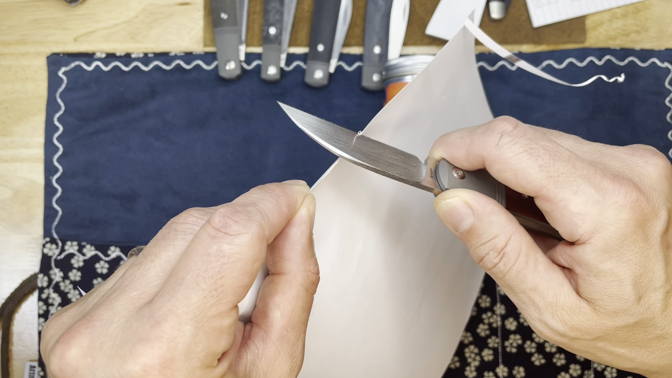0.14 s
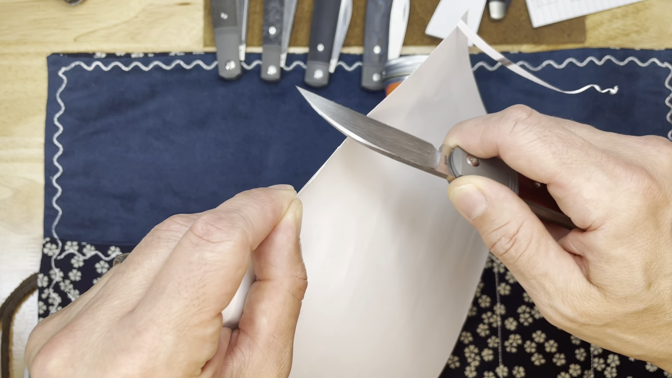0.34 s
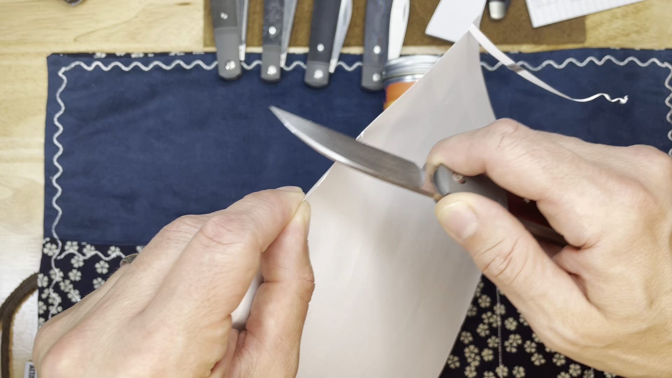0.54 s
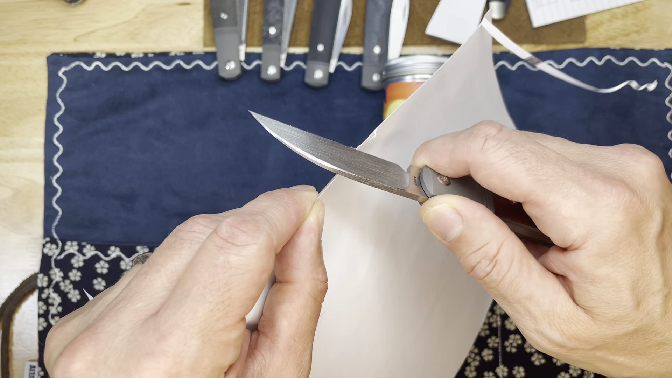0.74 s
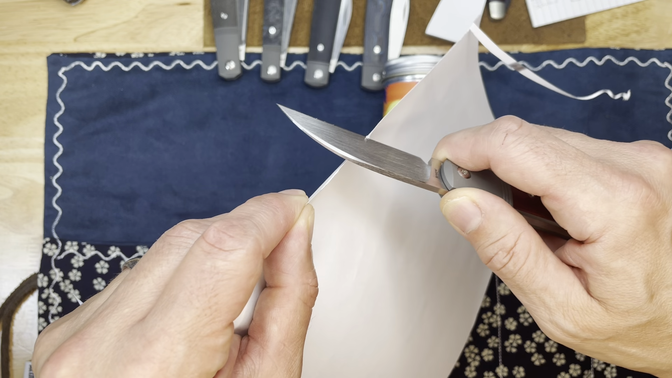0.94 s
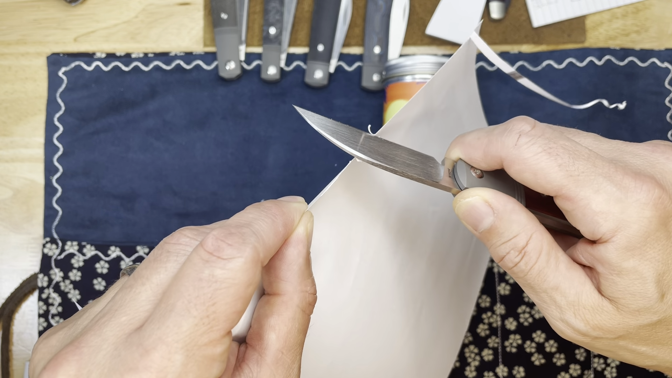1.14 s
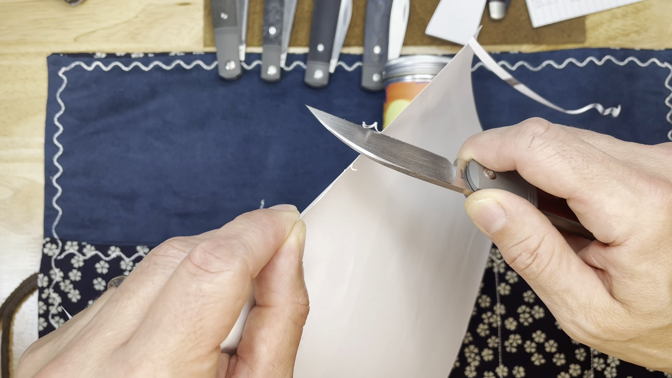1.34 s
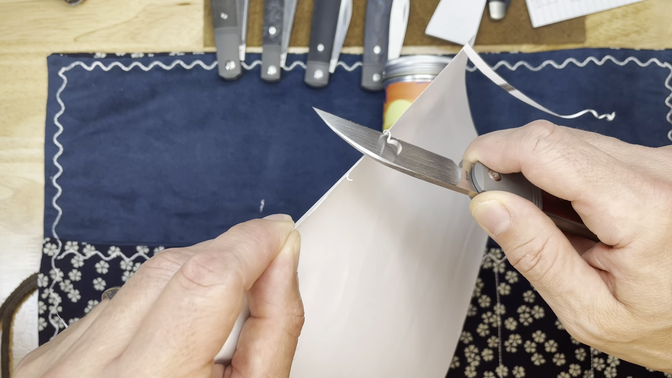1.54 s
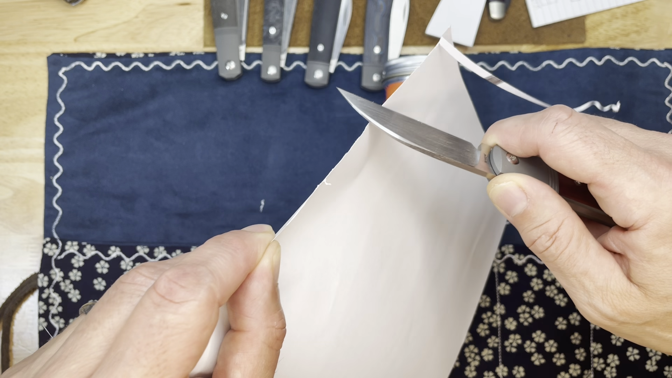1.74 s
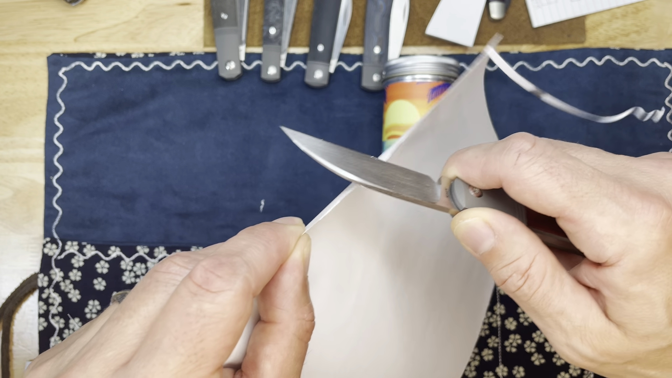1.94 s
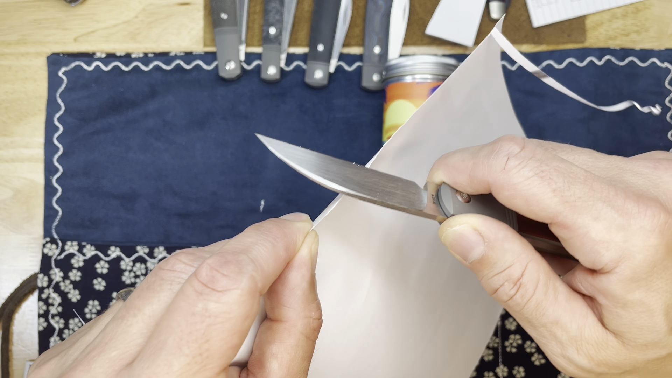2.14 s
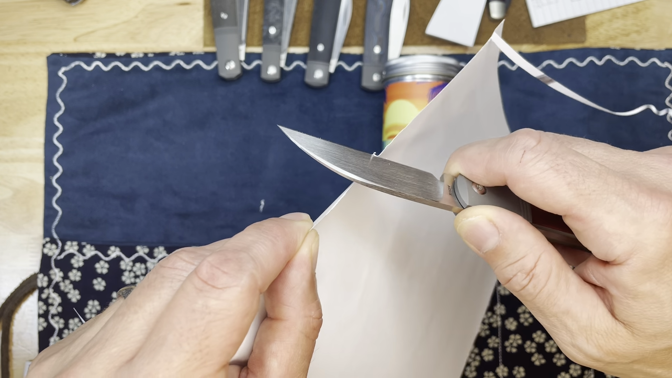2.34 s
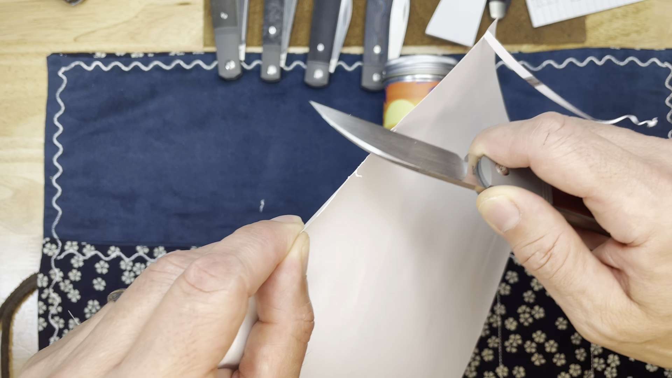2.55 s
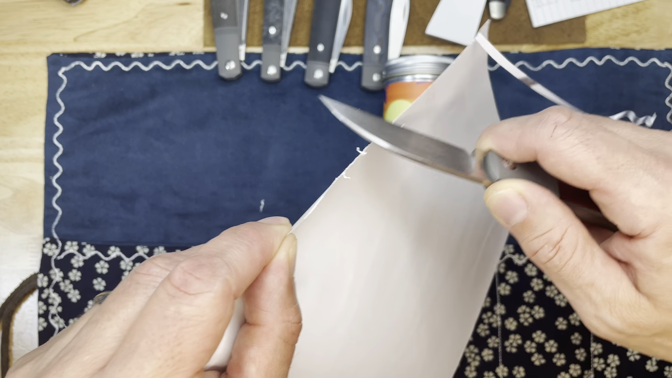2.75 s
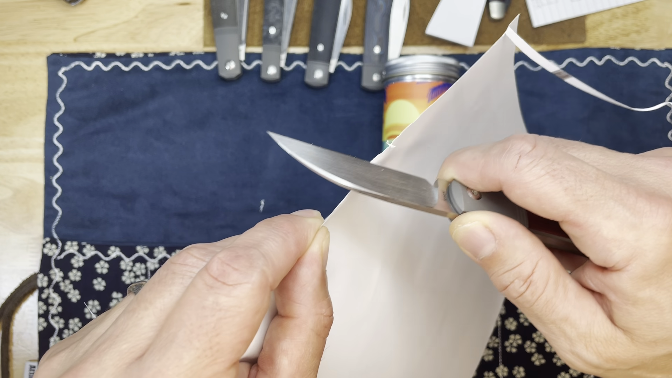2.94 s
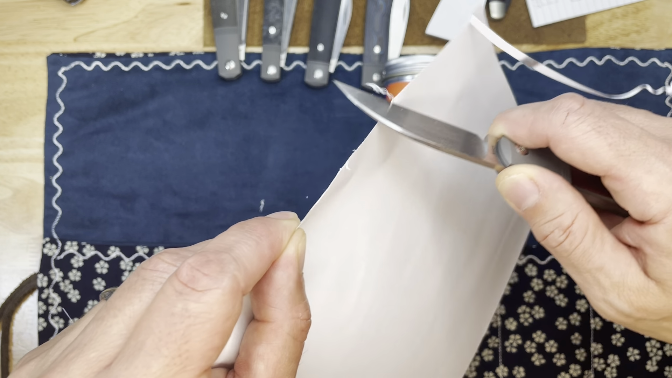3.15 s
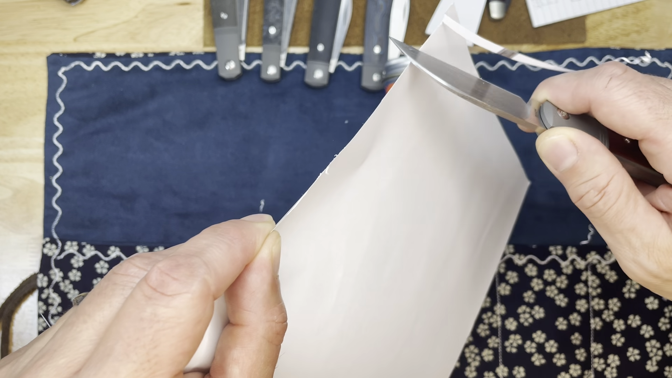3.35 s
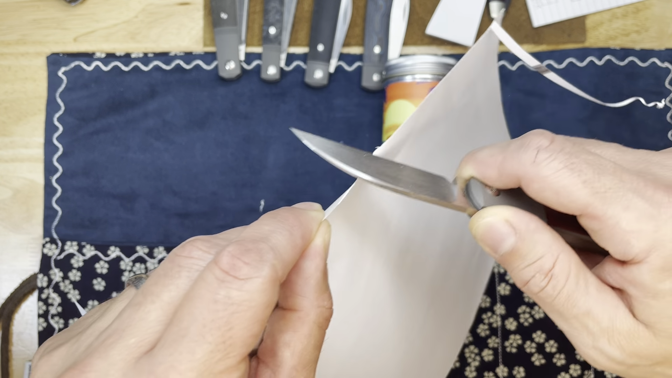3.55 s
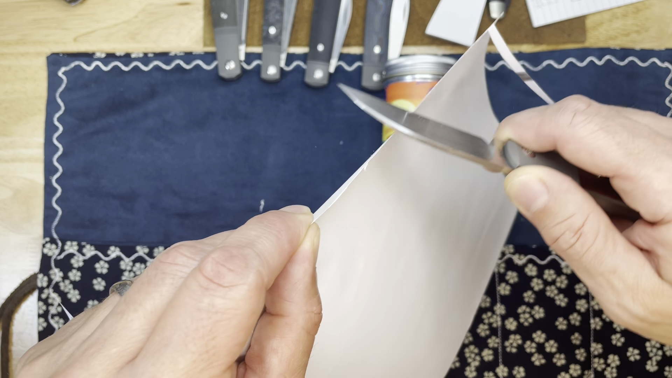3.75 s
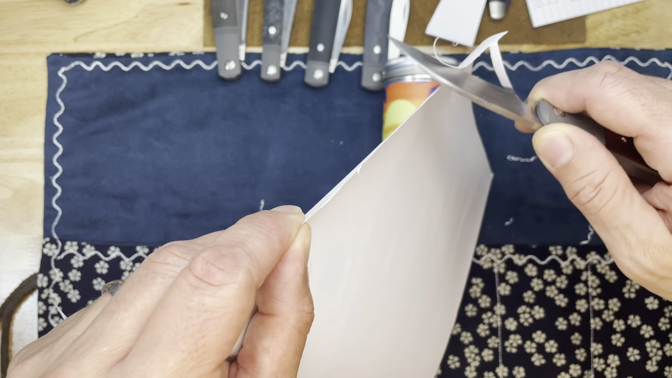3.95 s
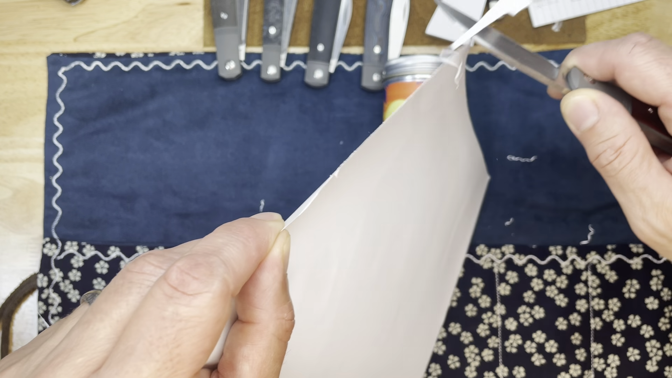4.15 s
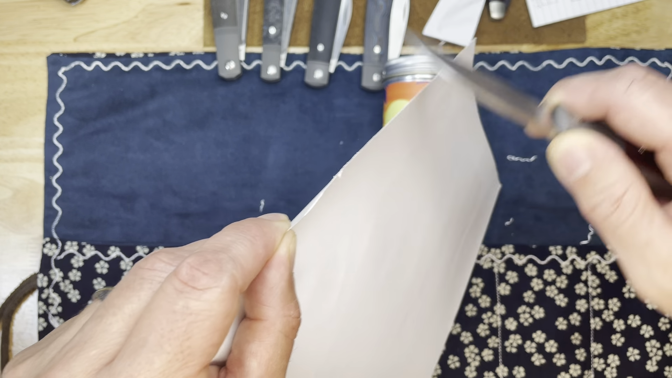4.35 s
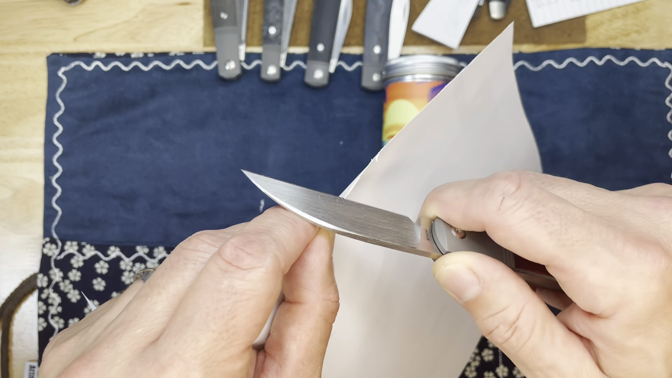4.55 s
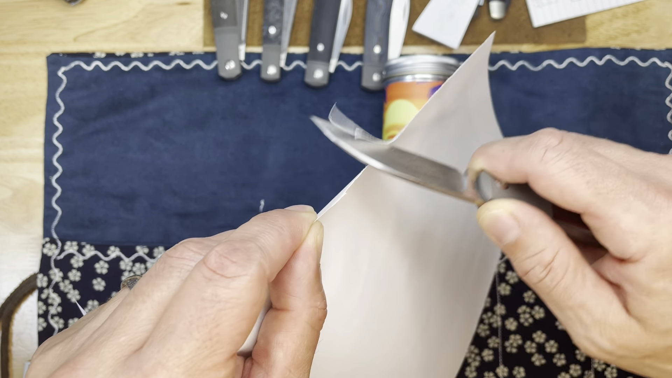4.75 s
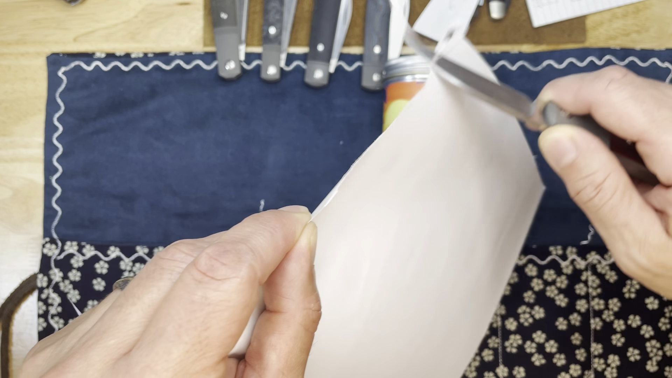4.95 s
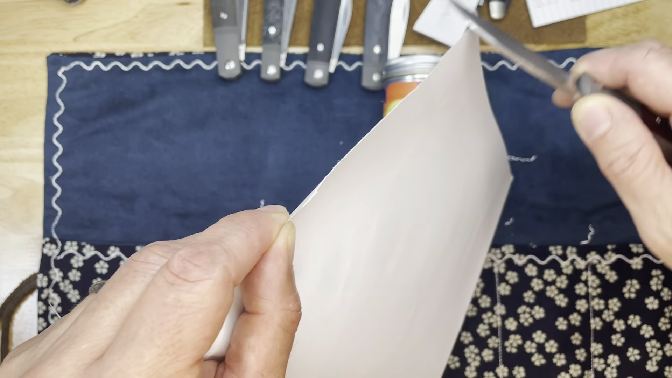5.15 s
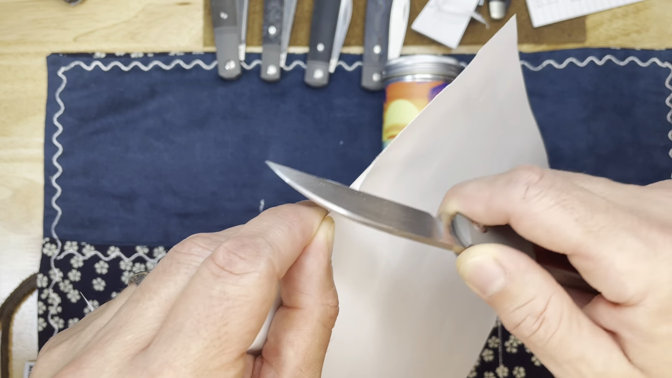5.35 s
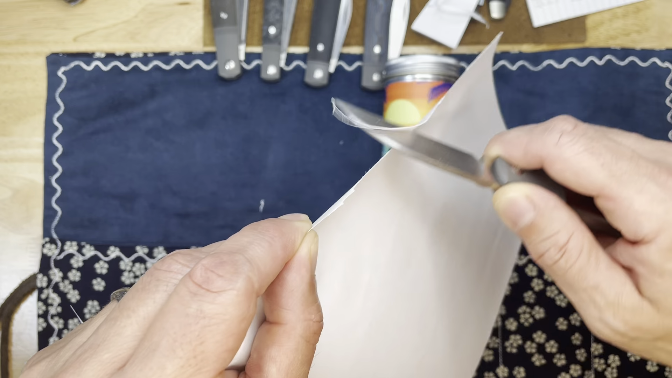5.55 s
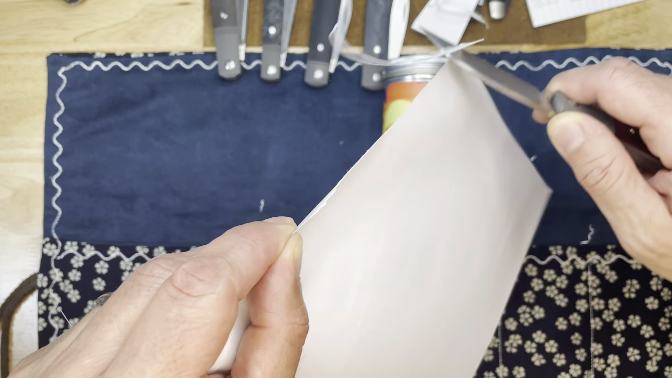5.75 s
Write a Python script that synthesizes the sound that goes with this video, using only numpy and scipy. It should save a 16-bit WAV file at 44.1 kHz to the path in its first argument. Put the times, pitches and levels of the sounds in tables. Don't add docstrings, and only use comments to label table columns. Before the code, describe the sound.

A small knife saws lightly at a hand-held sheet of paper with faint rasps and crackles, then makes three loud, crisp slices.

```python
import sys
import numpy as np
from scipy import signal
from scipy.fft import rfft, irfft, next_fast_len
from scipy.io import wavfile
from scipy.ndimage import uniform_filter1d, map_coordinates

SR = 44100
rng = np.random.default_rng(int(sys.argv[2]) if len(sys.argv) > 2 else 0)


def store_wav(level_fs):
    pcm = np.round(np.clip(np.atleast_2d(level_fs), -1, 1) * 32767)
    wavfile.write(sys.argv[1], SR, pcm.T.astype(np.int16))


def natural_amplitude(level_db):
    exponent = np.asarray(level_db, float) / 20
    return 10 ** exponent


N = 255780


def unit(x):
    return x / np.sqrt(np.mean(x ** 2) + 1e-20)


def along(points, hz):
    f, v = np.transpose(points)
    return np.interp(np.log(hz + 1), np.log(f + 1), v)


def filtered(x, response):
    m = next_fast_len(N + SR // 4)
    hz = np.fft.rfftfreq(m, 1 / SR)
    return irfft(rfft(x, m) * response(hz), m)[..., :N]


def wobble(rate_hz):
    knots = rng.standard_normal(int(N * rate_hz / SR) + 4)
    return map_coordinates(knots, [np.arange(N) * rate_hz / SR])


def per_sample(values):
    return np.interp(np.arange(N) / SR * 1000, np.arange(len(values)), values)


def registers(x, low_hz, high_hz):
    def even(part, window_s):
        power = uniform_filter1d(part[0] ** 2, int(window_s * SR))
        return part / np.sqrt(np.abs(power) + 1e-20)

    low = filtered(x, lambda hz: 1 / (1 + (hz / low_hz) ** 8))
    high = filtered(x, lambda hz: 1 - 1 / (1 + (hz / high_hz) ** 8))
    return even(low, .15), even(x - low - high, 0.031), even(high, 0.034)


def sheet(force, t60_s, direct, hold_s):
    # (frequency [Hz], width [Hz], level [dB])
    modes = [(392, 78, 14), (724, 17, -2), (905, 150, 5.5), (1053, 60, -1.5), (1260, 45, 9), (1388, 72, 6),
             (1605, 120, 4.5), (1894, 92, 8), (2500, 140, -5), (3174, 70, -6), (3810, 40, 0),
             (5030, 260, -13), (5450, 160, -8)]
    # (frequency [Hz], density [dB per Hz])
    fibre = [(60, -30.5), (200, -32.5), (330, -15.5), (560, -11.5), (800, -5.5), (2200, -6.5), (5500, -7.5),
             (6300, -10), (7900, -8), (8800, -8), (9800, -11), (11500, -16), (13200, -21), (15300, -17.5)]
    # (start [s], end [s], from [Hz], to [Hz], strength [ratio])
    climbs = [(0.125, 0.304, 900, 920, 0.094), (0.303, .46, 2570, 2500, 0.65), (0.7, .92, 880, 990, 0.16),
              (0.716, 0.796, 1310, 1400, 0.35), (.92, 1.72, 398, 377, 0.084),
              (.95, 1.248, 1025, 1000, 0.11), (2.0, 2.097, 1090, 1300, 0.027), (2.154, 2.9, 387, 387, 0.09),
              (2.963, 3.217, 1410, 1280, 0.21), (3.746, 4.141, 4390, 5360, 0.34),
              (4.03, 4.142, 3600, 3290, 0.55), (4.586, 4.678, 796, 1270, 0.19),
              (4.633, 4.946, 4200, 5170, 0.12), (5.039, 5.24, 233.5, 221, 0.42),
              (5.041, 5.14, 814, 683, 0.35), (5.348, 5.472, 800, 900, 0.041),
              (5.455, 5.71, 4320, 5750, 0.25)]
    climb_cycles, climb_extra_s = 26, 0.0025
    hop = int(hold_s * SR)
    count = N // hop + 2
    t = np.arange(SR // 16) / SR
    rings = rng.standard_normal((2, count, len(t))) * natural_amplitude(-60 * t / t60_s)
    rings /= np.linalg.norm(rings, axis=2, keepdims=True)
    rings[0, :, 0] += direct

    now = (np.arange(count)[:, None] * hop) / SR
    for start, end, from_hz, to_hz, strength in climbs:
        life_s = climb_cycles / from_hz + climb_extra_s
        edge_hz = np.interp(now, [start, end], [from_hz, to_hz])
        edge = np.sin(2 * np.pi * edge_hz * t) * natural_amplitude(-60 * t / life_s)
        edge /= np.linalg.norm(edge, axis=1, keepdims=True)
        rings[0] += strength * ((now > start) & (now < end)) * edge

    padded = np.pad(force, (hop, 3 * hop))
    pieces = np.array([padded[k * hop:(k + 2) * hop] for k in range(count)])
    pieces = pieces * np.sqrt(np.hanning(2 * hop))
    rung = signal.fftconvolve(pieces[None], rings, axes=2)
    out = np.zeros((2, (count + 2) * hop + len(t)))
    for k in range(count):
        out[:, k * hop:k * hop + rung.shape[2]] += rung[:, k]
    out = out[:, hop:hop + N] / np.hypot(1, [[direct], [0]])

    def body(hz):
        steady = 1 + sum(natural_amplitude(db) * 1j * hz * w / (c * c - hz * hz + 1j * hz * w) for c, w, db in modes)
        return steady * natural_amplitude(along(fibre, hz))

    return filtered(out, body)


def blade():
    # (start [s], length [s], first level [dB], last level [dB], brightness [dB])
    sawing = [(0.0, 0.0083, -38, -55, -2), (.126, .15, -49.5, -47.5, -0.5), (.295, 0.11, -59.5, -55, -0.5),
              (.67, 0.037, -83.5, -69, -5), (.705, 0.073, -66, -48, -2.5),
              (.795, 0.041, -59.5, -41.5, -0.5), (.83, 0.052, -46, -47.5, 1.5),
              (.925, 0.034, -50.5, -42.5, 2), (.961, 0.15, -42.5, -51.5, 0.5),
              (1.124, .018, -52, -44.5, -1), (1.154, 0.069, -48, -46.5, -3),
              (1.259, 0.11, -45.5, -40.5, -2.5), (1.344, 0.13, -43.5, -46, -3),
              (1.53, .104, -45.5, -40, -4), (1.65, 0.12, -48, -49.5, -3), (1.817, 0.021, -53.5, -52, -4.5),
              (1.859, .006, -46, -51.5, -12.5), (1.926, 0.15, -48.5, -46.5, -2.5),
              (2.063, 0.044, -50, -58.5, -5)]
    biting = [(2.148, 0.067, -65, -45.5, 4), (2.214, 0.045, -45.5, -46, 1), (2.412, 0.055, -55.5, -45, 3),
              (2.483, 0.12, -43, -57.5, -1.5), (2.618, 0.08, -46.5, -57, -3.5),
              (2.718, 0.027, -66, -53.5, -5.5), (2.748, 0.025, -49.5, -54.5, -8.5),
              (2.802, 0.11, -41, -48.5, -5), (2.957, 0.066, -51, -34, -8.5),
              (3.012, 0.18, -37.5, -34.5, -4), (3.222, 0.14, -47.5, -52, -2),
              (3.393, .057, -57.5, -41, -3.5), (3.454, 0.044, -47, -43, 0), (3.503, 0.084, -44, -46, -2),
              (3.618, .03, -36.5, -57.5, -14), (3.655, 0.062, -47, -40.5, -10)]
    slices = [(3.729, 0.043, -43, -29, -2), (3.772, 0.25, -32.5, -30.5, -3), (3.981, 0.15, -31.5, -31, 0),
              (4.596, 0.053, -56.5, -35, -4), (4.661, 0.24, -35.5, -29.5, -1.5),
              (4.9, 0.068, -34.5, -31, 0.5), (5.031, 0.032, -57, -41.5, -0.5), (5.157, .012, -68, -59, -1),
              (5.356, 0.022, -84, -48, -7), (5.381, 0.026, -52.5, -50.5, -11),
              (5.419, .048, -55.5, -31.5, -7), (5.476, 0.076, -33.5, -25.5, -2.5),
              (5.526, 0.26, -30.5, -28, -3.5)]
    bite_db_per_s, let_go_db_per_s, lifted_db = 1801, 406.5, -100
    dulls_db_per_s, dullest_db = 149.5, 9.5
    t = np.arange(N * 1000 // SR + 2) / 1000
    start, length, first_db, last_db, bright_db = np.vstack([sawing, biting, slices]).T[:, :, None]
    before_s, after_s = start - t, t - start - length
    run_db = first_db + (last_db - first_db) * np.clip((t - start) / np.maximum(length, .001), 0, 1)
    push_db = run_db - bite_db_per_s * np.maximum(before_s, 0) - let_go_db_per_s * np.maximum(after_s, 0)
    bright = bright_db - np.clip(dulls_db_per_s * after_s, 0, dullest_db)
    strongest = bright[push_db.argmax(0), np.arange(len(t))]
    return t, np.maximum(push_db.max(0), lifted_db), uniform_filter1d(strongest, size=9)


def slicing():
    # (time [s], thrum re rasp [dB])
    slack = [(0, -8.5), (.35, -13), (.8, -14), (1.0, -2), (1.4, -10.5), (1.56, -7.5), (1.75, -14),
             (2.05, -20.5), (2.24, -3.5), (2.5, -7.5), (2.7, -18), (2.85, -6.5), (3.05, -12.5), (3.5, -6.5),
             (4.65, -17), (4.96, -8), (5.09, 5.5), (5.45, -10.5)]
    thrum_follows, sizzle_follows = 0.9, 0.92
    middle_db, faint_db = -45, -61.5
    thrum_lag_s = 0.014
    snaps_per_s = 4000

    sizes = natural_amplitude(np.clip(2.6 * rng.standard_normal(N), -9, 7))
    snaps = (rng.random(N) < snaps_per_s / SR) * rng.choice([-1, 1], N) * sizes
    snaps = unit(unit(snaps) + .5 * rng.standard_normal(N))
    surge = natural_amplitude(1.3 * wobble(70) + 0.76 * wobble(300))
    rung = sheet(snaps * surge, t60_s=0.025, direct=0.68, hold_s=.06)
    thrum, rasp, sizzle = registers(rung, low_hz=650, high_hz=2970)

    def softer(db, share):
        return db + (share - 1) * (np.maximum(db, faint_db) - middle_db)

    def gain(db):
        return natural_amplitude(per_sample(db) + 0.98 * wobble(22))

    t, press_db, bright_db = blade()
    keep = np.exp(-t[1] / thrum_lag_s)
    lagging_db = signal.lfilter([1 - keep], [1, -keep], press_db - press_db[0]) + press_db[0]
    thrum_db = softer(lagging_db, thrum_follows) + np.interp(t, *np.transpose(slack))
    sizzle_db = softer(press_db, sizzle_follows) + bright_db + 3.0
    sound = gain(press_db) * rasp + gain(thrum_db) * thrum
    return sound + gain(sizzle_db) * natural_amplitude(1.2 * wobble(60)) * sizzle


def flexing():
    # (time [s], level [dB], build-up [dB per s], swing [Hz])
    whips = [
        (4.994, -46.5, 449.5, 62),
        (5.071, -49, 900, 95),
        (5.175, -71, 800, 110),
        (5.752, -63, 44, 70),
        (5.797, -40, 500, 120),
    ]
    flex_db, engaged_db, flex_follows = -71, -46.5, 0.37
    whip_dies_db_per_s, swing_db = 420, 2
    t, press_db, _ = blade()
    levels_db = [flex_db + flex_follows * np.minimum(press_db - engaged_db, 0)]
    swings = 0
    for s, db, rise, swing_hz in whips:
        levels_db.append(db - np.where(t < s, rise * (s - t), whip_dies_db_per_s * (t - s)))
        swell = natural_amplitude(swing_db + db - 9.9 * ((t - s) * swing_hz) ** 2)
        swings = swings + swell * np.cos(2 * np.pi * swing_hz * (t - s))

    def push(hz):
        band = (hz / 65) ** 3 / (1 + (hz / 65) ** 3) / (1 + (hz / 320) ** 3)
        return band * np.array([[1], [.3]])

    air = filtered(rng.standard_normal((2, N)), push)
    flutter = natural_amplitude(per_sample(np.max(levels_db, axis=0))) * unit(air * natural_amplitude(2.5 * wobble(30)))
    return flutter + per_sample(swings) * np.array([[1], [0]])


def room(x):
    # (frequency [Hz], t60 [s])
    decay = [(200, 0.1), (2000, 0.26), (10000, 0.22)]
    hz, t, z = signal.stft(rng.standard_normal((2, SR // 2)), SR, nperseg=256)
    fade = natural_amplitude(-60 * t / along(decay, hz)[:, None])
    tail = signal.istft(z * fade, SR, nperseg=256)[1]
    tail = tail / np.linalg.norm(tail[0])
    return signal.fftconvolve(np.pad(x, (260, 0))[None], tail, axes=1)[:, :N]


def hush():
    # (frequency [Hz], density [dB per Hz])
    floor = [(24, -23.5), (45, 6), (90, 1.5), (320, -21.5), (850, -12), (1100, -23.5), (2000, -21.5),
             (6400, -30.5), (9000, -39), (12000, -62.5)]
    hush_db = -76
    mid, side = filtered(rng.standard_normal((2, N)),
                         lambda hz: natural_amplitude(along(floor, hz)) * [hz ** 0, .9 * hz / (hz + 300)])
    return natural_amplitude(hush_db) * np.array([mid + side, mid - side]) / np.std(mid)


def catches():
    # (time [s], peak level [dB], thrum re peak [dB], sizzle re
    # peak [dB])
    catches_and_pops = [(0.119, -56, -14, -3), (1.086, -32.5, -17, -7), (1.255, -36, -6, -4),
                        (1.51, -28.5, -24, 5.5), (1.788, -42.5, -6, -14), (1.817, -47, -23, -7),
                        (1.86, -35, -1, -5.5), (1.929, -43.5, -18, -0.5), (2.11, -50, -15, -1),
                        (2.162, -46.5, -16, 4), (2.404, -43, -15.5, 1), (2.508, -31, -18, 0),
                        (2.586, -30.5, -11, -2), (2.618, -29, -21, -9), (2.749, -37, -22.5, -6),
                        (2.805, -44.5, -19, -10), (2.955, -42, -15, -5.5), (3.007, -26, -21.5, -12),
                        (3.277, -37, -0.5, -4.5), (3.612, -26.5, -24, -10.5), (3.667, -32.5, -10, -11),
                        (3.705, -36.5, 2, -8.5), (4.584, -49.5, -31, -9.5), (4.982, -20, -9.5, -22),
                        (0.655, -56, -6, 1.5), (0.689, -54, -21, -10.5), (0.71, -52, -25, 8), (0.731, -44, -23, 1),
               (0.751, -44, -20, -4), (4.431, -66, -18, 14), (4.542, -59, -14, -5.5),
               (5.058, -37, -13, 5.5), (5.071, -29, -7, -16), (5.12, -51, -5, -4), (5.164, -40, -3, 6.5),
               (5.226, -71, -5.5, 0), (5.38, -45.5, -11, -4.5)]
    settle_s, settle_gap_s = 4.349, 0.01
    settle_db, settle_fade_db = -68.5, 0.5
    settle_thrum_db, settle_sizzle_db = -6.5, 10
    swell_s = .0022

    settling = []
    for k, (a, b) in enumerate(rng.standard_normal((11, 2))):
        tick_s = settle_s + settle_gap_s * (k + .2 * a)
        tick_db = settle_db - settle_fade_db * k + 3 * b
        settling.append((tick_s, tick_db, settle_thrum_db, settle_sizzle_db))

    force = np.zeros((3, N + SR))
    t = np.arange(SR // 40) / SR
    for s, db, thrum_db, sizzle_db in catches_and_pops + settling:
        crackle = rng.standard_normal(len(t)) * t / swell_s * np.exp(1 - t / swell_s)
        levels_db = db + np.array([[thrum_db + 14.5], [0], [sizzle_db - 5.5]])
        force[:, round(s * SR):][:, :len(t)] += natural_amplitude(levels_db) * crackle

    def highpass(hz, corner_hz):
        return 1j * hz / corner_hz / (1 + 1j * hz / corner_hz)

    thrum = filtered(force[0, :N], lambda hz: 1 / (1 + 1j * hz / 600) ** 3)
    rasp = filtered(force[1, :N], lambda hz: (highpass(hz, 700) / (1 + 1j * hz / 3000)) ** 2)
    sizzle = filtered(force[2, :N], lambda hz: highpass(hz, 2900) ** 2)
    return sheet(natural_amplitude(8) * (thrum + rasp + sizzle), t60_s=.028, direct=1.0, hold_s=.05)


def ports(pair):
    # (frequency [Hz], correlation [ratio]); top treble arrives as one wave
    alike = [(100, 0.62), (400, 0.79), (1000, 0.81), (3300, 0.46), (6000, 0.68), (7300, 0.61)] + [(7900, 1)]
    # (frequency [Hz], level [dB])
    lean = [(60, 4), (200, -5), (700, -1), (1300, -2.5), (2400, 2), (4400, 4), (6200, 2.5)] + [(7600, 0)]
    # (frequency [Hz], phase [rad])
    lead_low = [(0, 0), (2200, 0.8), (4300, 0.37), (5600, 0.98), (6900, -1.08)]
    # (frequency [Hz], phase [half turns])
    lead_top = [(8050, -1), (8550, -1), (11000, -2), (12300, -2), (14200, -3), (15100, -3), (15700, -2.87)]
    lead = lead_low + [(hz, np.pi * turns) for hz, turns in lead_top]

    def share(hz):
        angle = np.arccos(np.clip(along(alike, hz), -1, 1)) / 2
        return np.array([np.cos(angle), np.sin(angle)])

    def casing(hz):
        skew = natural_amplitude(along(lean, hz) / 2) * np.exp(.5j * np.interp(hz, *np.transpose(lead)))
        return np.array([skew, 1 / skew])

    mid, side = filtered(pair, share)
    heard = filtered(np.array([mid + side, mid - side]), casing)
    turned = filtered(heard, lambda hz: 1j * np.minimum(hz / 9000, .8) * np.array([[1], [-1]]))
    sway_rad = 0.16 * wobble(24)
    return np.cos(sway_rad) * heard + np.sin(sway_rad) * turned


def scene():
    duck_at_db, duck_s, room_db = -37, .35, -14.0
    paper = slicing() + catches() + flexing()
    keep = np.exp(-1 / (duck_s * SR))
    recent = signal.lfilter([1 - keep], [1, -keep], paper[0] ** 2)
    duck = (1 + recent / natural_amplitude(2 * duck_at_db)) ** .25
    return ports(paper + natural_amplitude(room_db) * room(paper[0])) + hush() / duck


def roll_off(x):
    return signal.sosfilt(signal.butter(12, 15710, fs=SR, output="sos"), x)


def record(dry):
    cut = filtered(dry, lambda hz: (1j * hz / 45 / (1 + 1j * hz / 45)) ** 2)
    return roll_off(cut)


dry = scene()
out = record(dry)
store_wav(out)
```